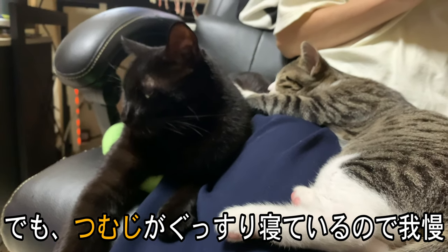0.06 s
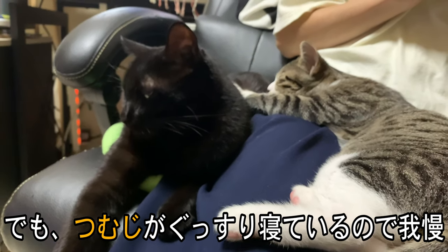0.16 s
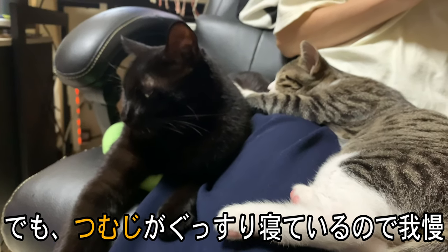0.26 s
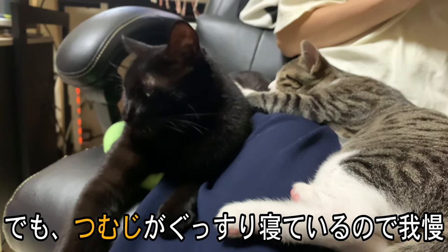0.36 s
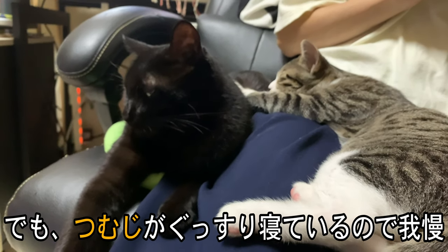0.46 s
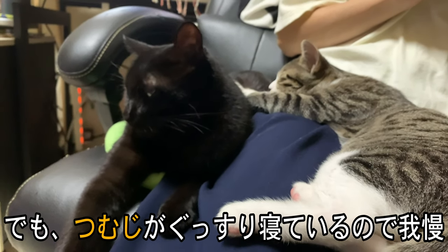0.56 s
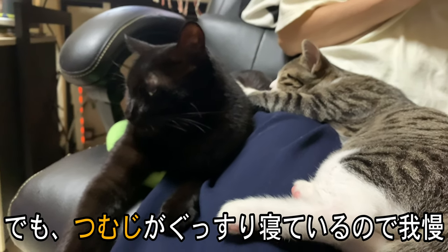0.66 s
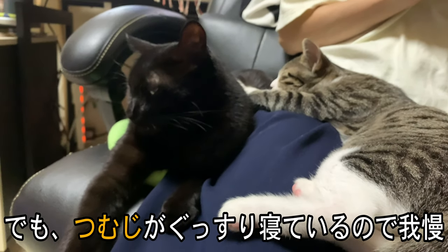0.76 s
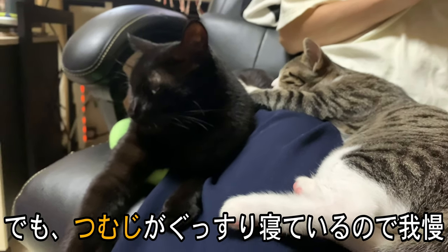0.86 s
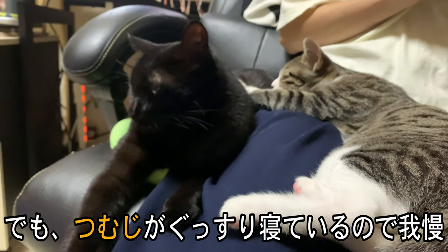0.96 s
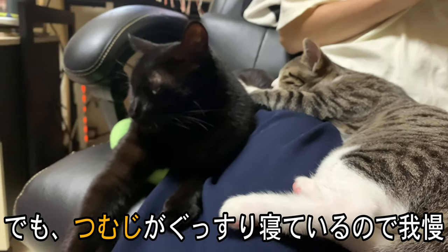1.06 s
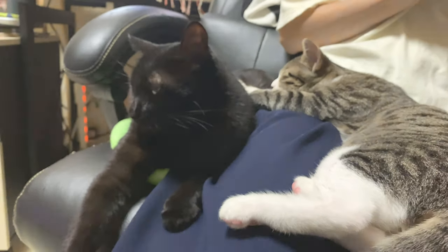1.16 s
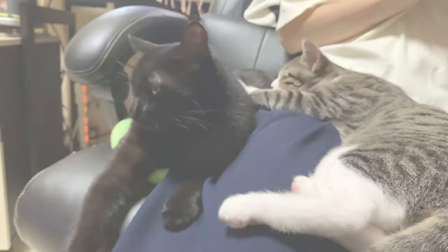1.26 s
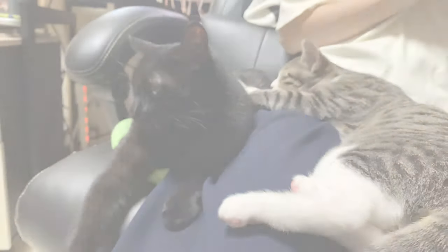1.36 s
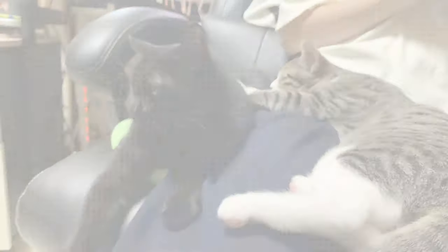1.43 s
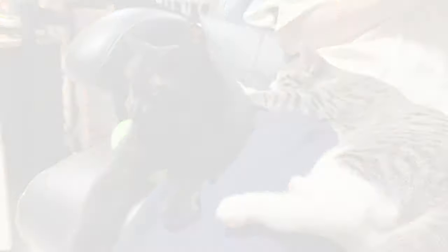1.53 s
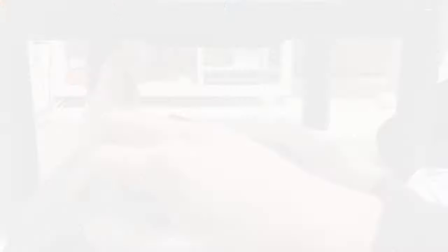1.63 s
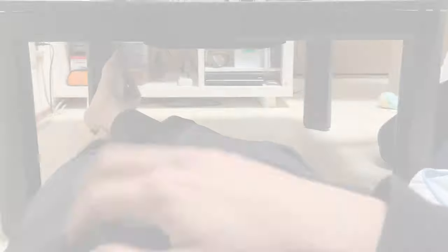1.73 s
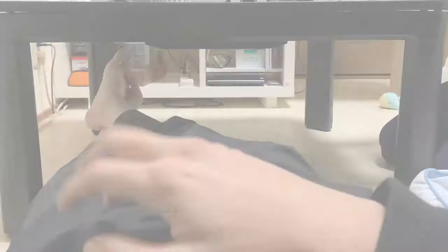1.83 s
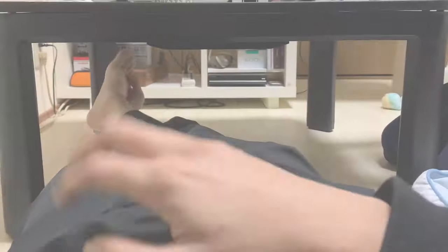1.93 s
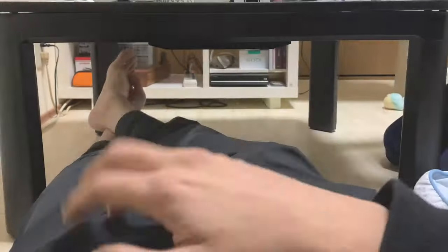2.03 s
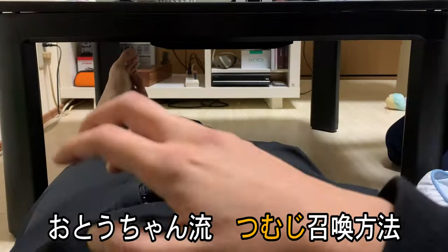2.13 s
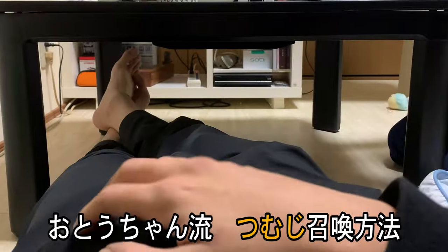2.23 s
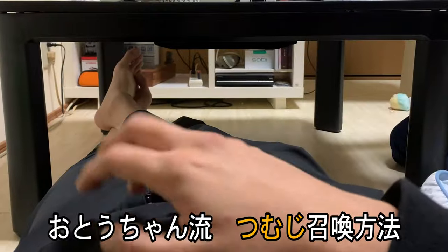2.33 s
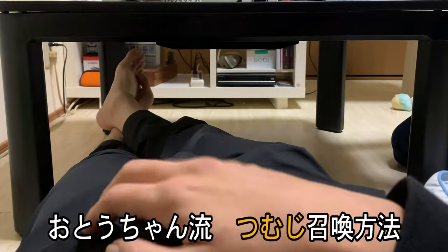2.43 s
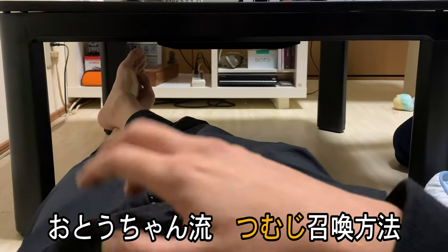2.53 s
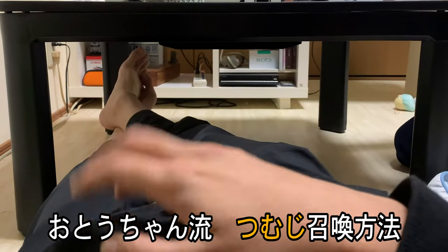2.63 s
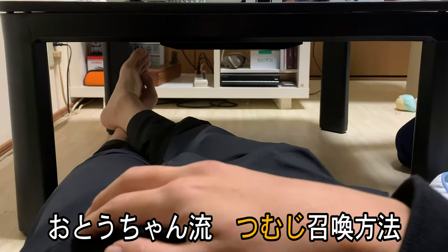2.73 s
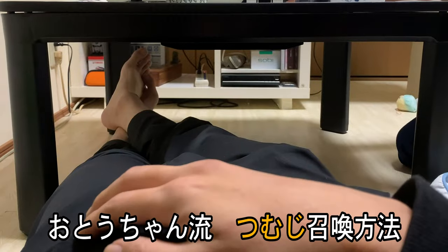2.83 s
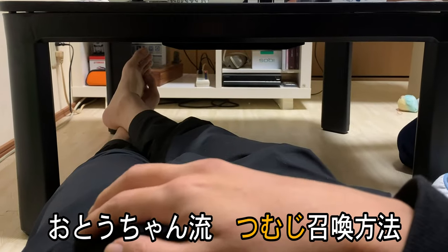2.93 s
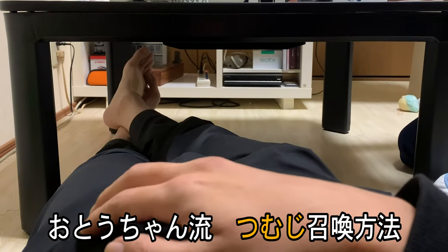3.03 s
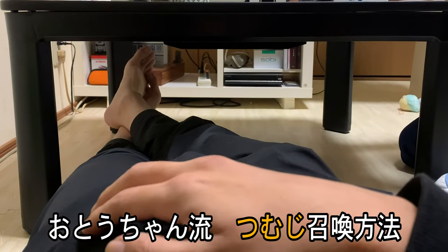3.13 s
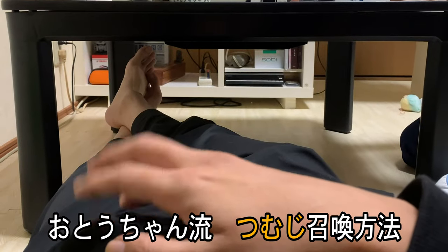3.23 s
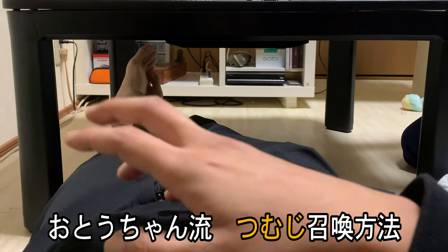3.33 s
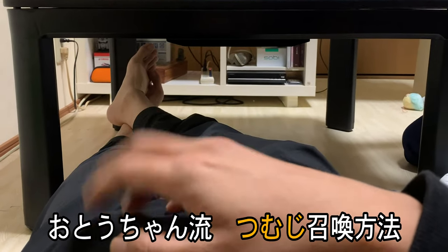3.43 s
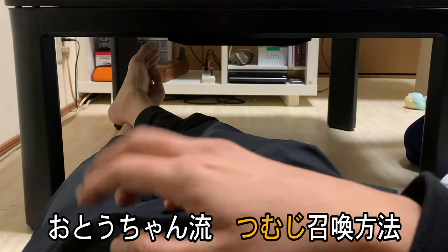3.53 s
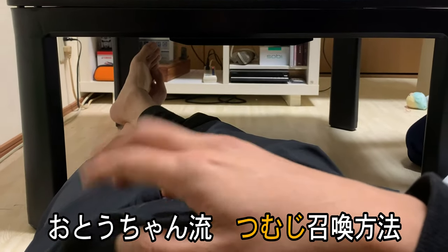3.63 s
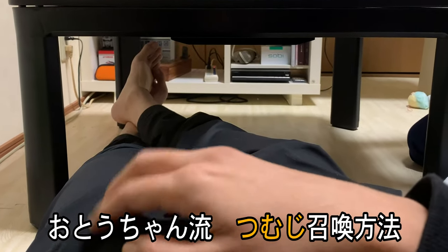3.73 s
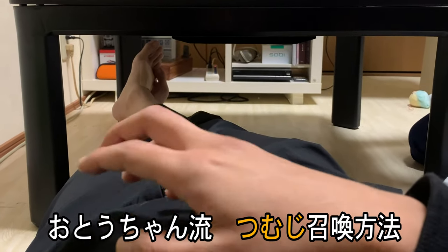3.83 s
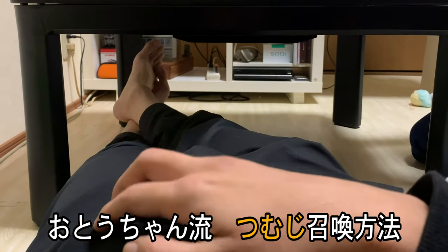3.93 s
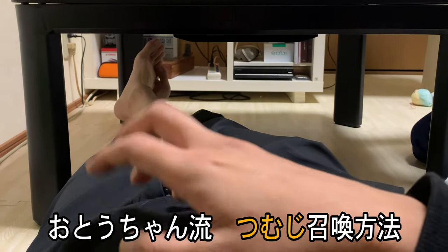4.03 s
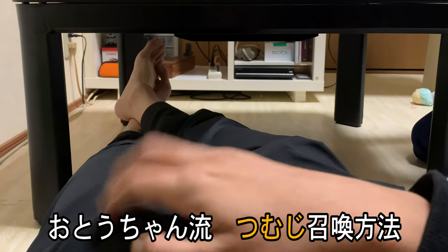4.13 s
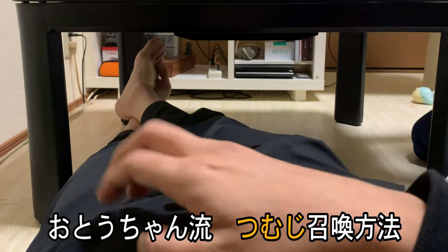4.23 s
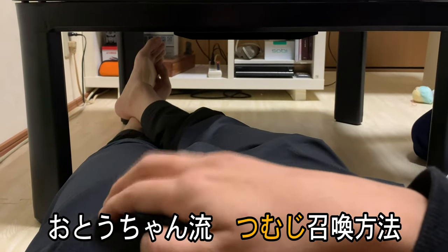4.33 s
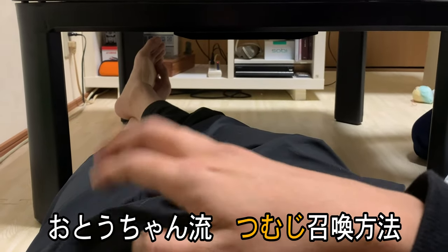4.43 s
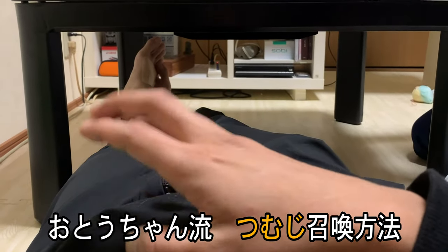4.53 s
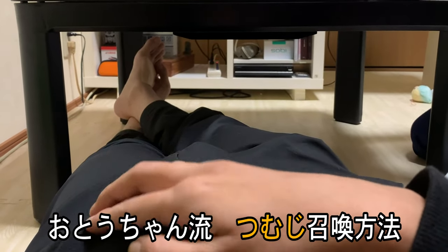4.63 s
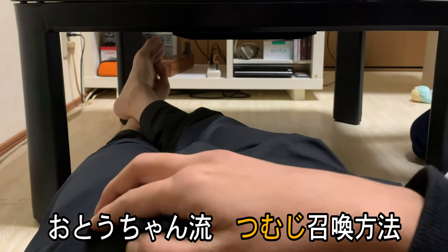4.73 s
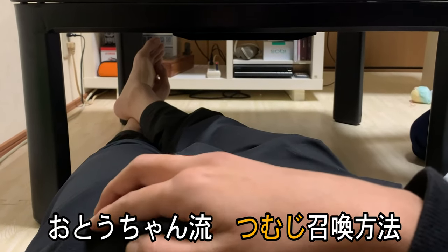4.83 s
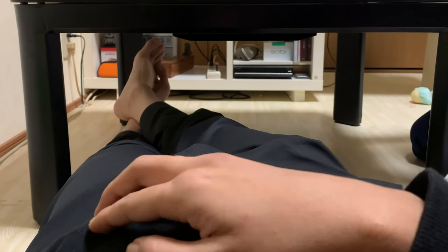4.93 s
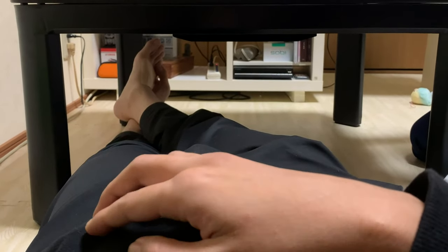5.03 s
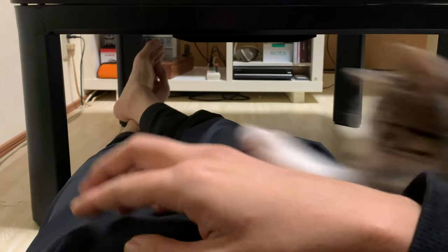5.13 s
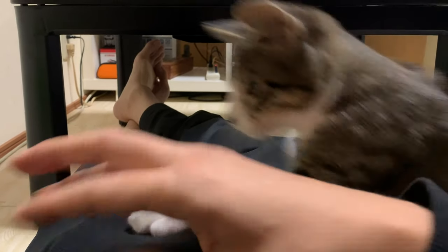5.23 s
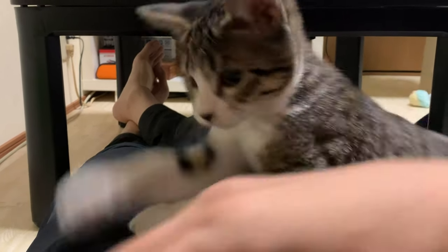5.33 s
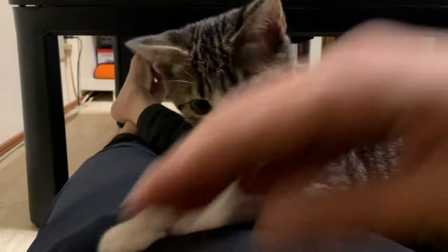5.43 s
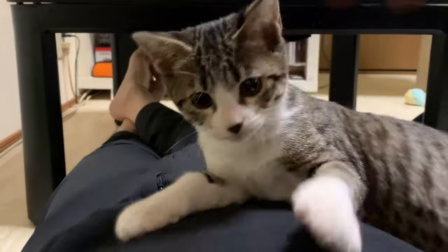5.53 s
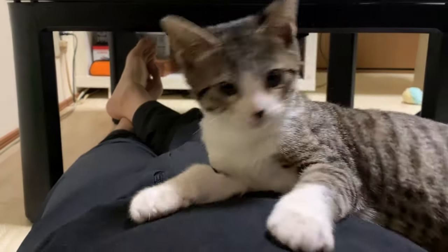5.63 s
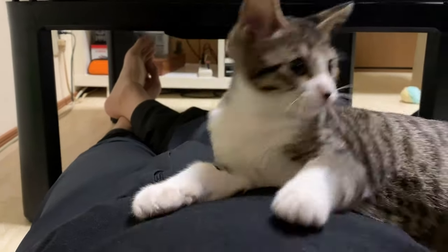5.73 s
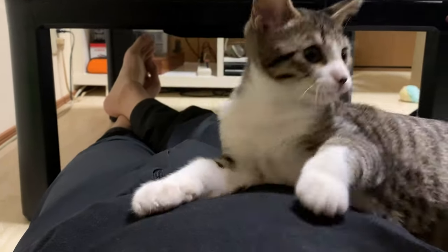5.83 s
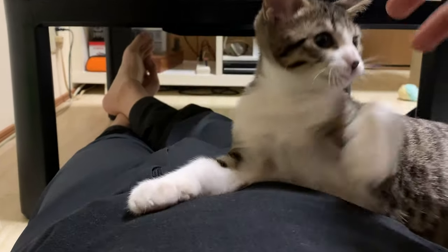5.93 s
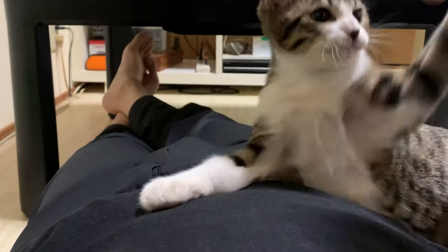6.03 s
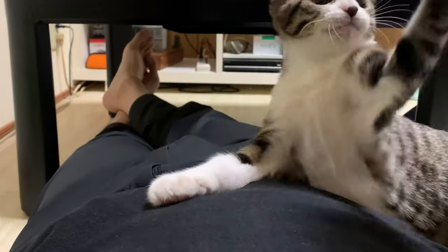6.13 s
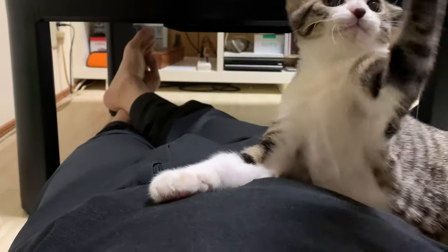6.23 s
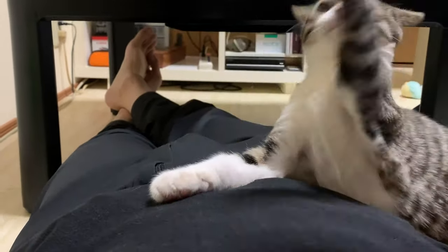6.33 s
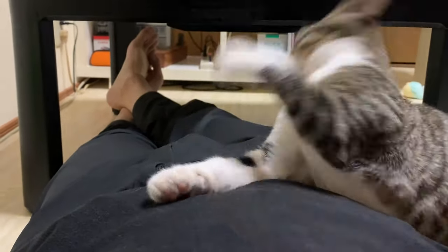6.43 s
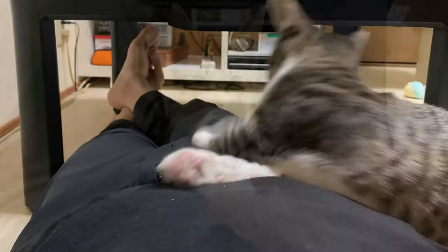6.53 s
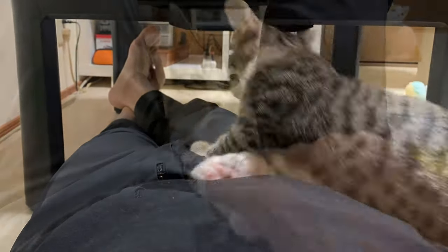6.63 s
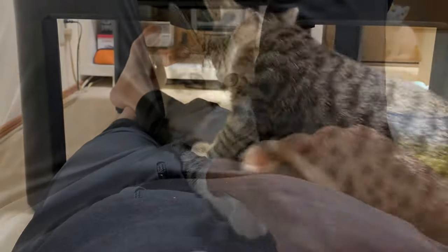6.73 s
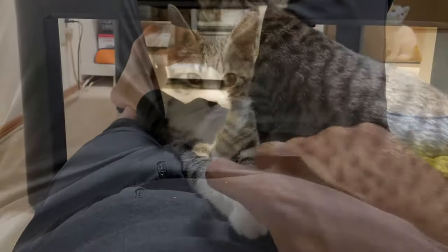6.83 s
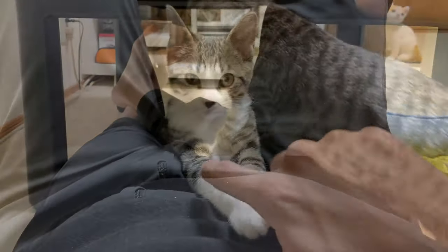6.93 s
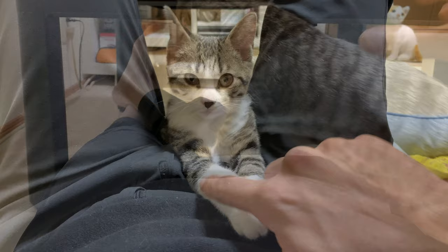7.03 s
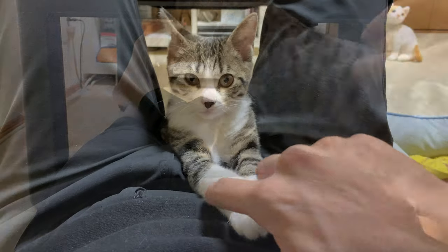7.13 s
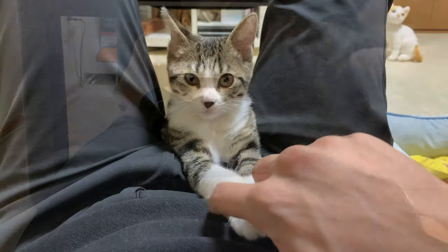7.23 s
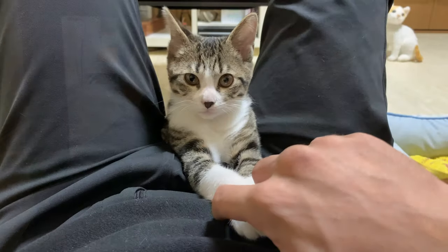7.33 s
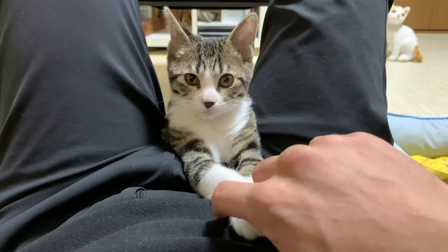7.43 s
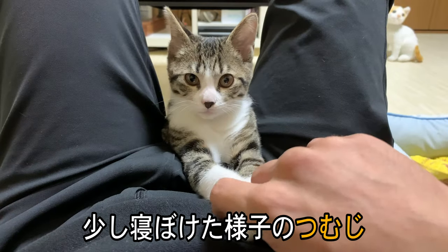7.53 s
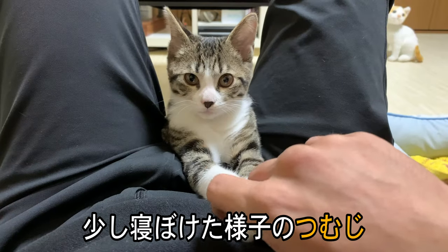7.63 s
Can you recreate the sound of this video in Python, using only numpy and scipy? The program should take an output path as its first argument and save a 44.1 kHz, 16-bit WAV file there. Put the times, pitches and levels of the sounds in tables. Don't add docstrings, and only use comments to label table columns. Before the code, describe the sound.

Close phone pickup in a small, fairly dry room with low rumble and faint hiss. After a short silence, fingers tap on clothed thigh about four times a second, clicky with a light low palm thud. The taps pause and repeat more dully. Then a cat lands in a dense flurry of soft knocks and rustle, settles quietly, and a faint low fluttering purr closes.

```python
import sys
import numpy as np
from scipy import signal
from scipy.fft import rfft, irfft, next_fast_len
from scipy.io import wavfile
from scipy.ndimage import uniform_filter1d, map_coordinates

SR = 44100
rng = np.random.default_rng(int(sys.argv[2]) if len(sys.argv) > 2 else 0)


def persist_wave(psi):
    counts = np.round(np.clip(psi, -1, 1) * 32767).astype(np.int16)
    wavfile.write(sys.argv[1], SR, np.atleast_2d(counts).T)


def ratio(d):
    e = np.asarray(d, float) / 20
    return 10 ** e


N = 338247
T = np.arange(N) / SR


def unit(x):
    return x / np.sqrt(np.mean(x ** 2) + 1e-20)


def along(points, hz):
    f, v = np.transpose(points)
    return np.interp(np.log(hz + 1), np.log(f + 1), v)


def wobble(rate_hz):
    knots = rng.standard_normal(int(N * rate_hz / SR) + 4)
    return map_coordinates(knots, [T * rate_hz])


def filtered(x, response):
    m = next_fast_len(N + SR // 2)
    return irfft(rfft(x, m) * response(np.fft.rfftfreq(m, 1 / SR)), m)[..., :N]


def colour(spectrum):
    norm = np.sqrt(np.mean(ratio(along(spectrum, np.linspace(0, SR / 2, 4096))) ** 2))
    return lambda hz: ratio(along(spectrum, hz)) / norm


def rush(spectrum, alike, grain_db=0., rate_hz=300):
    pair = rng.standard_normal((2, N)) * ratio(grain_db * wobble(rate_hz))

    def mid_side(hz):
        turn = np.arccos(np.clip(along(alike, hz), -1, 1)) / 2
        return ratio(along(spectrum, hz)) * [np.cos(turn), np.sin(turn)]

    mid, side = filtered(pair, mid_side)
    return unit(np.array([mid + side, mid - side]))


def narrow(hz, width_hz, db):
    line = filtered(rng.standard_normal(N), lambda f: 1 / (1 + ((f - hz) / width_hz) ** 2))
    return ratio(db) * unit(line)


def rings(events, cycles, gain_db):
    out, t = np.zeros(N + SR), np.arange(SR // 8) / SR
    for s, db, hz in events:
        swing = np.sin(2 * np.pi * hz * t) * np.exp(-t * hz / cycles) * (1 - np.exp(-t * hz / 0.46))
        out[round(s * SR):][:len(t)] += ratio(db + gain_db) * swing
    return out[:N]


def nearer(x, turn, pan_db):
    half = np.array([[.5], [-.5]])
    return filtered(x, lambda hz: ratio(half * pan_db(hz)) * np.exp(1j * turn(hz) * [[0], [-1]]))


# (frequency [Hz], t60 [s])
WALL_T60 = [(150, 0.4), (1500, 0.19), (6000, 0.24), (14000, 0.2), (15200, 0.091)]


def walls(x):
    out, step = np.zeros((2, N + 2 * SR)), SR // 5
    for i in range(0, N, step):
        if np.abs(x[i:i + step]).max() > 1e-4:
            hz, t, z = signal.stft(rng.standard_normal((2, SR // 3)), SR, nperseg=256)
            decay_db = -60 * t / along(WALL_T60, hz)[:, None]
            gate_db = -8 / (1 + np.exp((.08 - t) / 0.0036))
            reflections_db = 2.1 * rng.standard_normal(z.shape[-1])
            z = z * ratio(decay_db + gate_db + reflections_db)
            tail = signal.istft(z, SR, nperseg=256)[1]
            wet = signal.fftconvolve(x[None, i:i + step], tail / np.linalg.norm(tail[0]), axes=1)
            out[:, i + 200:][:, :wet.shape[1]] += wet
    return out[:, :N]


BLIND_HZ = 15050


def seen(hz):
    return np.where(hz > BLIND_HZ, ratio(-40), 1)


# (start [s], end [s])
GAP = (1.1455, 1.2045)
# (rumble [dB], air [dB], hiss [dB])
ROOM_FIRST = (-64, -71, -79)
ROOM_AFTER = (-54, -69, -78.5)
# (frequency [Hz], density [dB/Hz])
RUMBLE_FIRST = [(12, -36), (20, -8.5), (54, -9.5), (70, -2), (92, -1.5), (167, -38.5), (260, -24),
                (340, -51), (570, -120)]
RUMBLE_AFTER = [(12, -56), (20, -23), (70, -1), (108, 4), (129, -2), (171, -16), (201, -16.5), (241, -33),
                (260, -19.5), (340, -83), (570, -120)]
AIR = [(110, -10), (190, -2.5), (239, -11.5), (301, -4), (409, -15), (520, -15), (647, -21), (1010, -23),
       (1350, -26), (2020, -26.5), (2600, -41), (3380, -89), (5720, -120)]
HISS = [(1180, -13), (2000, -2), (2640, -5.5), (5000, -5.5), (7200, -10), (11200, -6.5), (13000, -9),
        (15000, -15.5)]
# (frequency [Hz], left-right likeness [-1..1])
ROOM_ALIKE = [(60, 0.92), (180, 0.95), (550, 0.3), (1650, 0.012), (15000, 0.01)]
# (time [s], share [0-1])
DRONE_SHARE = [
    (1.2, 0.84),
    (5.5, 0.86),
    (5.8, 0.43),
    (6.8, 0.22),
    (7.0, 0.6),
]
# (frequency [Hz], width [Hz], level [dB])
HUM = [(121.1, 2.4, -66), (298.5, 2.9, -70.5), (1044, 75, -86)]
WHINE = (5110, 9, -94)
SHIELD_DB = 6.5


def room():
    first = T < GAP[0]
    levels_db = np.where(first, np.array(ROOM_FIRST)[:, None], np.array(ROOM_AFTER)[:, None])
    rumble_db, air_db, hiss_db = levels_db
    share = np.clip(np.interp(T, *np.transpose(DRONE_SHARE)), 0, 1) * ~first
    rumble = np.sqrt(1 - share) * rush(RUMBLE_FIRST, ROOM_ALIKE)
    rumble += np.sqrt(share) * rush(RUMBLE_AFTER, ROOM_ALIKE, grain_db=-0.5, rate_hz=7.9)
    rumble *= ratio(rumble_db + 2.5 - SHIELD_DB * (1 - share) * ~first)
    air = ratio(air_db + 1.5) * rush(AIR, ROOM_ALIKE)
    hiss = filtered(ratio(hiss_db + 2.0) * rush(HISS, ROOM_ALIKE), seen)
    drone = first * narrow(*WHINE) + sum(narrow(*line) for line in HUM) * np.sqrt(share)
    return rumble + air + hiss + drone


# (time [s], level [dB])
PURR = [
    (6.95, -47),
    (7.07, -44),
    (7.2, -46),
    (7.29, -43.5),
    (7.42, -47),
    (7.5, -52),
    (7.67, -49),
]
# (frequency [Hz], width [Hz], gain [dB])
CHEST = [(125, 32, 7), (360, 220, -11), (700, 130, -17)]
PURR_FROM_S, PURR_RATE_HZ, PURR_SLOWS_HZ_PER_S = 6.9492, 25.15, 6.5


def purr():
    since = np.maximum(T - PURR_FROM_S, 0)
    phase = (PURR_RATE_HZ - PURR_SLOWS_HZ_PER_S * since / 2) * since
    beats = np.zeros(N)
    for lag_cycles, beat_db in [(0, 3), (.3, -5)]:
        at = np.flatnonzero(np.diff(np.ceil(np.maximum(phase - lag_cycles, 0))) > 0)
        level_db = np.interp(T[at], *np.transpose(PURR))
        beats[at] = ratio(level_db + beat_db + 36 + 1.3 * wobble(25)[at])
    rasp = ratio(-60 * np.arange(900) / SR / 0.082)
    flutter = np.convolve(beats, rasp)[:N] * rng.standard_normal(N)

    def body(f):
        chest = sum((-1) ** k * ratio(g) * 1j * f * w / (c * c - f * f + 1j * f * w)
                    for k, (c, w, g) in enumerate(CHEST))
        fur = (1 / (1 - (f / 900) ** 2 + 1.2j * f / 900)) ** 2
        return chest * fur

    return filtered(beats + ratio(-27.5) * flutter, body)


# (time [s], peak [dB])
LONE_TICK = (6.9475, -39)


def lone_tick():
    tick = ratio(LONE_TICK[1]) * (np.arange(N) == round(LONE_TICK[0] * SR))
    return filtered(tick, lambda hz: seen(hz) / (1 + (hz / 5500) ** 3))


GATHER, SAG_DB, LET_GO_S = 0.22, 4.5, 0.033


def strokes(rows):
    power = np.zeros((2, N))
    for s, length_s, db, over_db in rows:
        u = (T - s) / length_s
        release = np.exp(-np.maximum(u - 1, 0) * length_s / LET_GO_S)
        shape = np.clip(u / GATHER, 0, 1) * ratio(-SAG_DB * np.clip(u, 0, 1)) * release
        power += (ratio([[db], [db + over_db]]) * shape) ** 2
    return np.sqrt(power)


# (start [s], length [s], swish [dB], scuff over swish [dB])
SLIDES = [(1.19, .24, -66.5, 1.5), (1.36, 0.25, -81.5, 5), (3.4, 0.28, -75.5, 3), (3.5, 0.32, -67.5, -4),
          (5.08, 0.14, -65.5, 2.5), (5.2, 0.14, -60.5, -7), (5.28, 0.066, -53, -7),
          (5.345, 0.045, -53, -5.5), (5.405, 0.047, -59, -2.5), (5.46, 0.11, -70, 2),
          (5.55, 0.099, -75, 4.5), (5.645, 0.082, -69, 0), (5.74, 0.097, -79, 7), (6.04, 0.098, -77, -8),
          (6.56, .07, -79, -1)]
# (start [s], length [s], folds [dB], thud over folds [dB])
PRESSES = [(1.2, 0.1, -58.5, 7), (1.31, 0.062, -58, 18), (3.5, 0.12, -68, 4), (3.62, 0.15, -64.5, -3),
           (5.09, 0.11, -61.5, 22.5), (5.185, 0.024, -55, 12), (5.215, 0.034, -48.5, 9),
           (5.28, .04, -44.5, 17.5), (5.322, 0.017, -37, -12), (5.35, 0.076, -52.5, 13),
           (5.44, 0.042, -50, 6), (5.58, 0.081, -56.5, 12.5), (5.69, 0.092, -58.5, 8.5),
           (5.77, 0.12, -63.5, 15.5), (6.02, 0.12, -83, 17), (6.565, 0.029, -60.5, 10),
           (6.86, 0.027, -67, 21), (7.6, 0.092, -69, 20)]
# (time [s], half length [s], level [dB])
BRUSHES = [
    (7.204, 0.084, -77),
    (7.604, 0.1, -76),
    (7.67, 0.033, -71),
]
# (time [s], peak [dB], pitch [Hz])
KNOCKS = [(0.073, -55.5, 625), (3.182, -45.5, 525), (3.69, -53, 1300), (4.455, -54, 1000),
          (5.141, -44.5, 1820), (5.157, -46, 1560), (5.191, -47, 590), (5.235, -39, 470), (5.286, -50, 704),
          (5.306, -44, 610), (5.329, -40, 830), (5.345, -35, 1150), (5.454, -50, 660), (6.572, -58, 673)]
LANDING = [(5.122, -39, 81.4), (5.139, -33, 75.4), (5.161, -35, 56), (5.245, -37, 89.5), (5.294, -37, 132),
           (5.3055, -23.5, 127.3), (5.326, -33, 165), (5.34, -34, 153), (5.3575, -28.5, 71.6),
           (5.3715, -43, 68), (5.3865, -42, 66), (5.7, -39.5, 63)]
# (frequency [Hz], density [dB/Hz])
SWISH = [(1530, -31), (2600, -6.5), (5000, -4.5), (6500, 0), (7900, -11), (9000, -1), (10000, -17),
         (15500, -26), (16000, -50)]
FUR = [(1530, -59), (2600, -0.5), (5000, -1.5), (7500, -7), (8500, -2.5), (12000, -9.5), (15600, -12),
       (16100, -44)]
SCUFF = [(1000, -22), (1450, -3.5), (1850, 1), (2350, -5), (2800, -41), (4000, -60)]
FOLDS = [(150, -20), (250, -7.5), (310, 0), (356, -12.5), (521, -10), (1400, -24.5), (1820, -55),
         (3080, -120)]
WEIGHT = [(18, -53), (30, -22), (73, -3), (156, -7), (194, -11.5), (400, -25), (520, -64), (880, -120)]
BRUSH = [(1200, -10), (1900, -7), (2600, -9), (3300, -6.5), (3800, -15), (5000, -35)]
# (frequency [Hz], left-right likeness [-1..1])
CLOTH_ALIKE = [(60, 0.74), (180, 0.85), (550, 0.7), (1650, -0.034), (15000, 0.022)]


def cloth():
    (slide, drag), (crease, press) = strokes(SLIDES), strokes(PRESSES)
    hand = rush(SWISH, CLOTH_ALIKE, grain_db=2.5, rate_hz=350)
    fur = rush(FUR, CLOTH_ALIKE, grain_db=2.0, rate_hz=300)
    swish = slide * np.where(T < 4.9, hand, fur)
    swish = filtered(swish, lambda hz: np.maximum(seen(hz), ratio(-3)))
    scuff = drag * rush(SCUFF, CLOTH_ALIKE, grain_db=2.0, rate_hz=200)
    folds = crease * rush(FOLDS, CLOTH_ALIKE, grain_db=2.0, rate_hz=90)
    weight = ratio(-9) * press * rush(WEIGHT, CLOTH_ALIKE)
    brushing = sum(ratio(db) * np.exp(-((T - s) / half_s) ** 2) for s, half_s, db in BRUSHES)
    brush = brushing * rush(BRUSH, CLOTH_ALIKE, grain_db=2.5)
    knocks = rings(KNOCKS, cycles=4.1, gain_db=-0.5)
    landing = rings(LANDING, cycles=1.4, gain_db=5.5)
    paws = nearer(knocks + landing, lambda hz: -0.0034 * hz, lambda hz: -1.5)
    echo = ratio(-16.5) * walls(30 * knocks) / 30
    return swish + scuff + folds + weight + brush + paws + echo


# (time [s], level [dB], mid body [dB])
FINGERS = [(1.6056, -29.5, -16), (1.6086, -42.5, 6), (1.6142, -33.5, -0.5), (1.8403, -33.5, -25),
           (1.8483, -46, 9), (2.0672, -31.5, 2), (2.075, -42.5, 0), (2.3, -33.5, -10), (2.3029, -39, -23),
           (2.3093, -39, -26), (2.5175, -45.5, 4.5), (2.5218, -43, 7.5), (2.5286, -50, 4),
           (2.761, -41.5, 2), (2.767, -42, -8), (3.517, -58, 11), (3.5233, -57, -8), (3.5352, -54.5, -1),
           (3.7335, -41, 1), (3.742, -48, 14), (3.9705, -35.5, -7), (3.975, -42, 5.5), (4.208, -31.5, -6),
           (4.2126, -35.5, 3), (4.4294, -41, 4), (4.6957, -46, 11.5), (4.6996, -37, -21), (4.705, -35, -6),
           (4.7102, -52, 17), (5.2954, -48, -4)]
# (time [s], crispness [dB], palm push peak [dB], push pitch [Hz])
PATS = [(1.604, 0.5, -36.5, 256), (1.841, -0.3, -32.5, 92.5), (2.065, 0.1, -33, 129), (2.299, 1, -36, 108),
        (2.521, -1, -46, 208), (2.757, -1, -42, 123), (3.53, -4, -72, 120), (3.735, -5, -33.5, 110),
        (3.969, -2.6, -43.5, 144), (4.209, -2, -32.5, 98), (4.427, -0.5, -68, 130), (4.697, -2.1, -35, 148)]
# (frequency [Hz], density [dB/Hz])
SLAP = [(1180, -8), (2000, -1.5), (2850, -8.5), (3700, -6.5), (6500, -1), (7800, -8.5), (9500, -2),
        (14500, -6.5), (15700, -7), (16000, -26), (16700, -43)]
BODY = [(210, 8), (350, 3), (555, -5), (936, -5), (1430, -0.5), (2800, -14), (3640, -23), (6160, -120)]
TAIL = [(290, -47), (500, -9), (803, -12), (1430, -6.5), (2430, -9), (8000, -8.5), (9700, -6.5),
        (13000, -13), (14500, -3.5), (15500, -14)]
# (frequency [Hz], left lead [rad])
LEFT_LEAD = [(0, 0), (1700, 2.6), (3000, 3.2), (3600, 5.8), (4900, 6.3), (5800, 9.2), (7500, 7),
             (7900, 2 * np.pi)]
# (frequency [Hz], left over right [dB])
SHADOW = [(300, -1), (700, 8), (1300, 9), (2400, 5), (4400, 2), (7000, 3), (9000, 3.5), (11500, 1),
          (14000, .5)]


def pats():
    layers, blows = np.zeros((3, 2, N + SR)), np.zeros((3, N))
    t = np.arange(900) / SR
    sharp = (1 - np.exp(-t / 0.00052)) * ratio(-60 * t / 0.014)
    soft = (1 - np.exp(-t / 0.0058)) ** 2 * ratio(-60 * t / 0.048)
    for s, db, body_db in FINGERS:
        n = rng.standard_normal((4, len(t)))
        grain_db = 2 * uniform_filter1d(n[3], size=12) * np.sqrt(12)
        crackle = (n[0] + .2 * n[1:3]) * ratio(grain_db)
        tilt_db = np.interp(s, *np.transpose(PATS)[:2])
        gains = ratio(db + np.array([-tilt_db, tilt_db, body_db]))
        slap = ratio(4.0) * gains[:2, None, None] * sharp * crackle
        layers[:2, :, round((s - .001) * SR):][..., :len(t)] += slap
        layers[2, :, round((s - .006) * SR):][:, :len(t)] += ratio(1.5) * gains[2] * soft * crackle
        blows[:, round(s * SR)] = ratio(20.5) * gains
    slap_tone, body_tone = colour(SLAP), colour(BODY)
    top = lambda hz: 1 / (1 + (8300 / (hz + 1)) ** 8)
    tones = [lambda hz: slap_tone(hz) * (1 - top(hz)), lambda hz: slap_tone(hz) * top(hz), body_tone]
    dry = sum(filtered(x[:, :N], tone) for x, tone in zip(layers, tones))
    push = rings([(s, db, hz) for s, _, db, hz in PATS], cycles=1.1, gain_db=3.5)
    close = nearer(dry + push, lambda hz: np.interp(hz, *np.transpose(LEFT_LEAD)),
                   lambda hz: along(SHADOW, hz))
    slaps = blows[0] * 0.33 + blows[1] * 0.62
    into_room = filtered(slaps, lambda hz: colour(TAIL)(hz) / (1 + (hz / 15600) ** 60))
    into_room += 0.51 * filtered(blows[2], body_tone) + 0.93 * push
    return close + ratio(-11.0) * walls(into_room)


def scene():
    return room() + purr() + lone_tick() + cloth() + pats()


ONE_PORT_HZ, IN_STEP_HZ, PORT_LAG_S = 7900, 10300, 13.7 / SR
SHARED_HZ = 9000


def ports(x):
    above = lambda hz, edge_hz, width_hz: 1 / (1 + np.exp((edge_hz - hz) / width_hz))

    def late(hz):
        return np.exp(-2j * np.pi * PORT_LAG_S * (hz - IN_STEP_HZ) * above(hz, ONE_PORT_HZ, 80))

    def share(hz):
        from_left = above(hz, SHARED_HZ, 800)
        return np.sqrt([from_left, 1 - from_left])

    return np.array([filtered(x[0], late), filtered(x, share).sum(axis=0)])


def top_cut(x):
    return signal.sosfilt(signal.butter(12, 16830, fs=SR, output="sos"), x)


def record(dry):
    heard = filtered(ports(dry), lambda hz: (1j * hz / (35 + 1j * hz)) ** 2)
    open_gain = np.clip(np.maximum(GAP[0] - T, T - GAP[1]) / 0.00064, 0, 1)
    return top_cut(heard * open_gain)


dry = scene()
out = record(dry)
persist_wave(out)
```